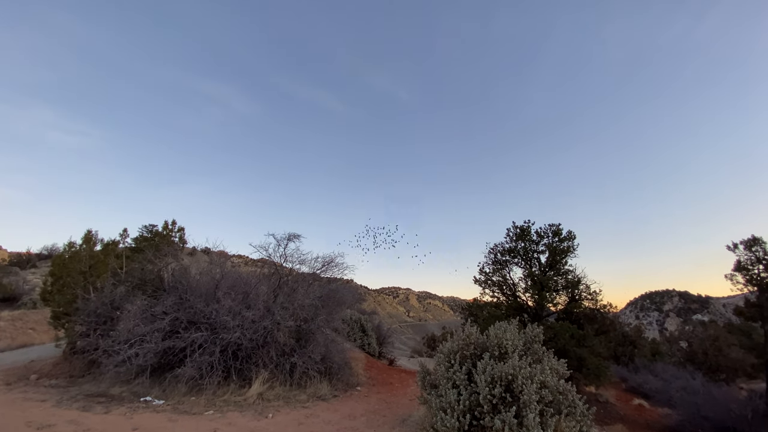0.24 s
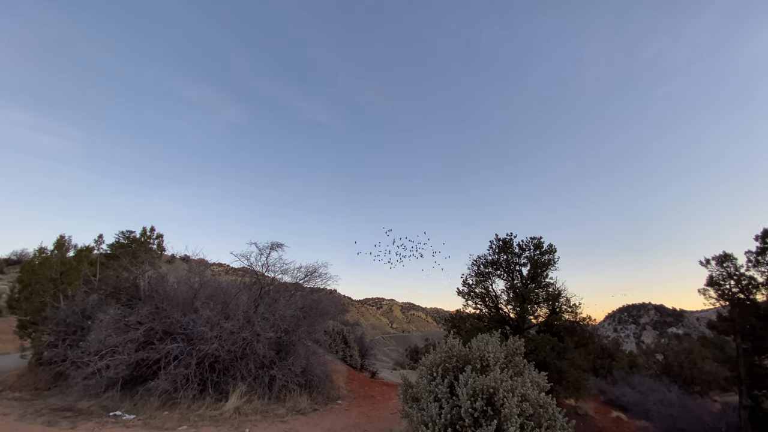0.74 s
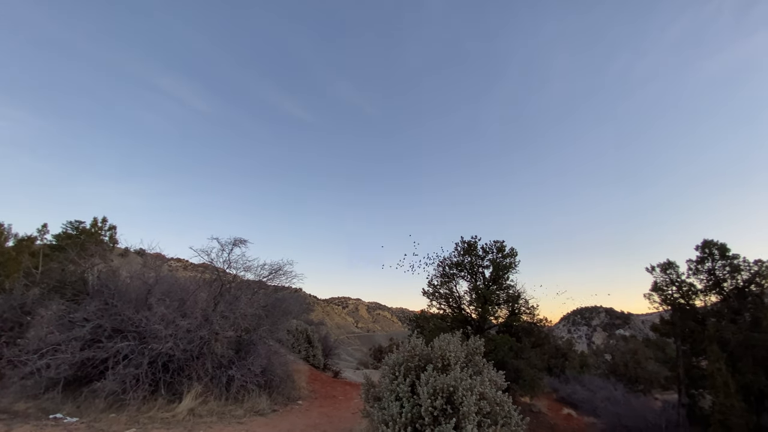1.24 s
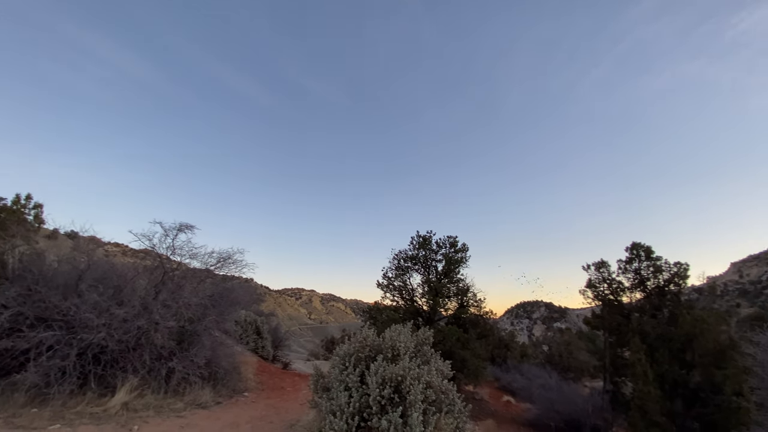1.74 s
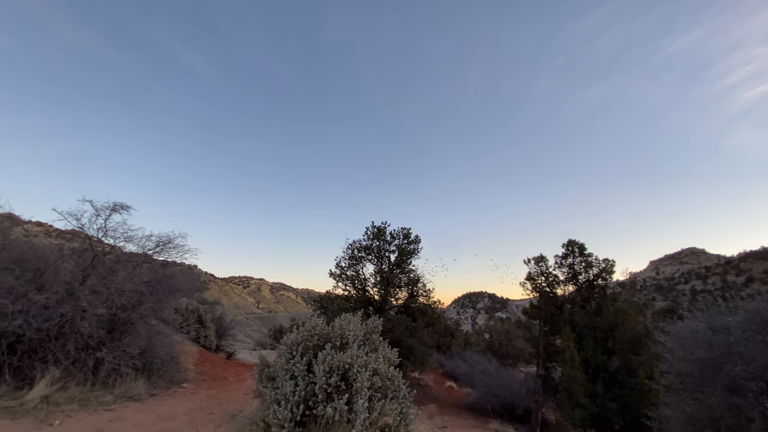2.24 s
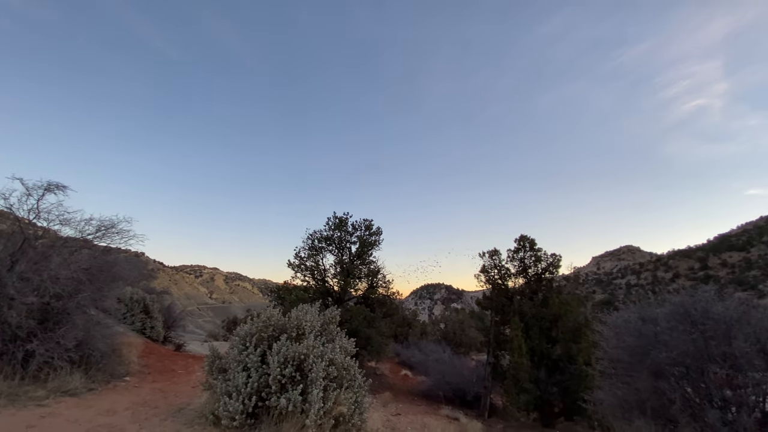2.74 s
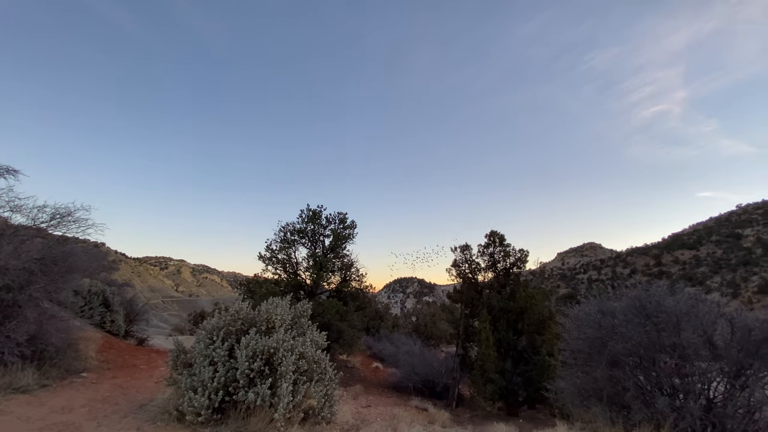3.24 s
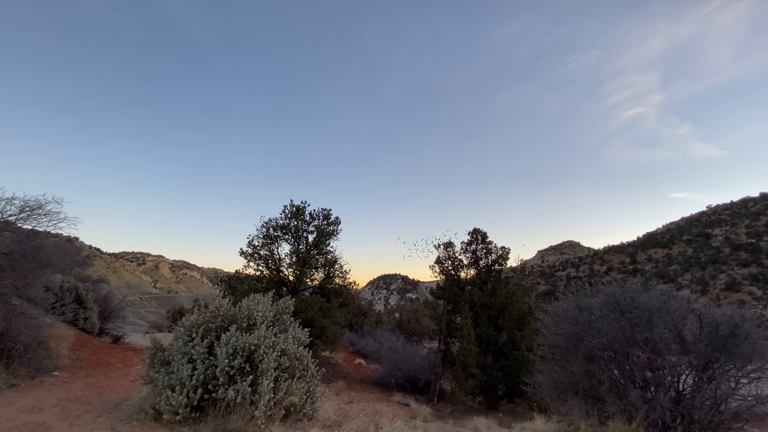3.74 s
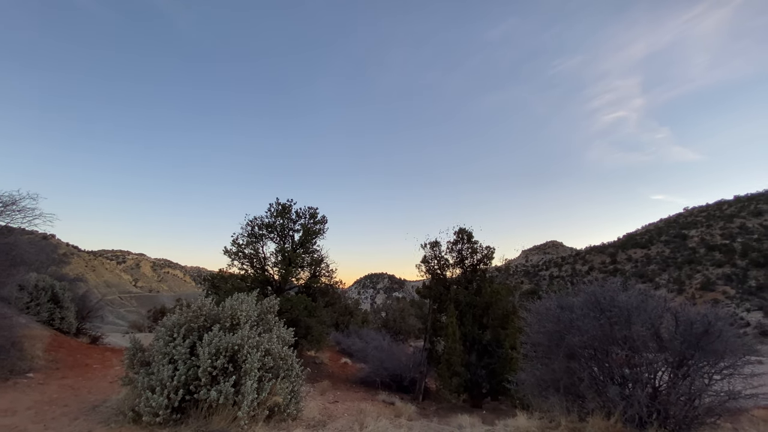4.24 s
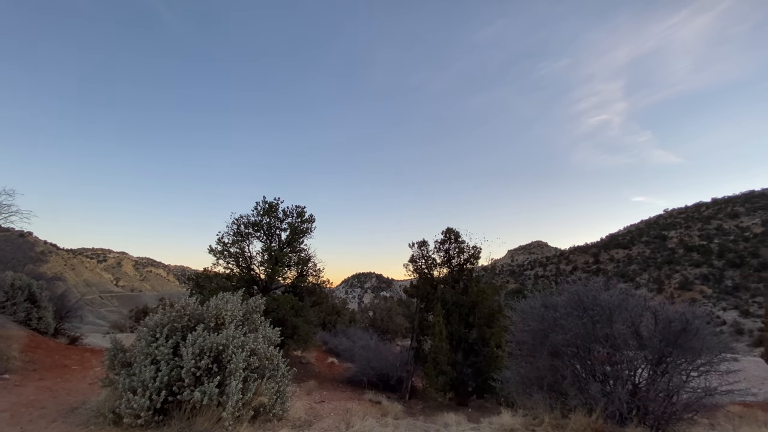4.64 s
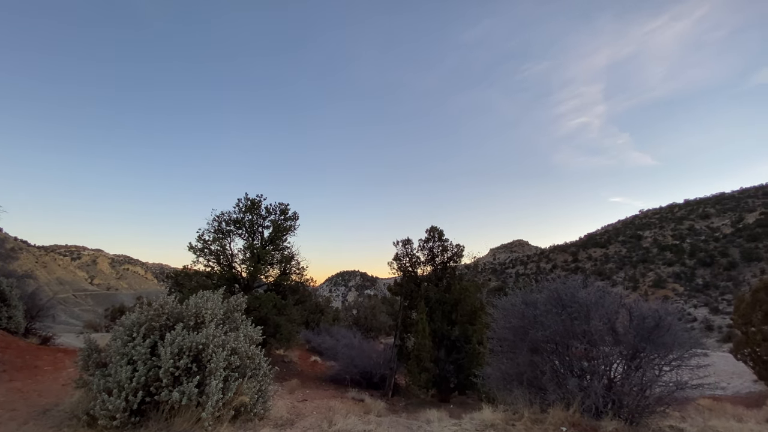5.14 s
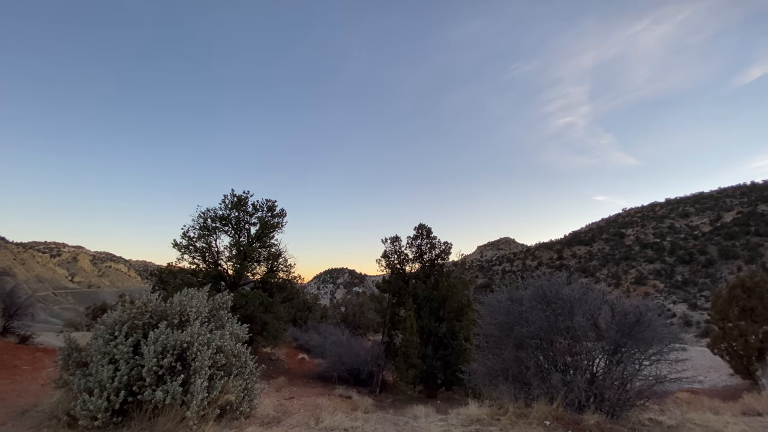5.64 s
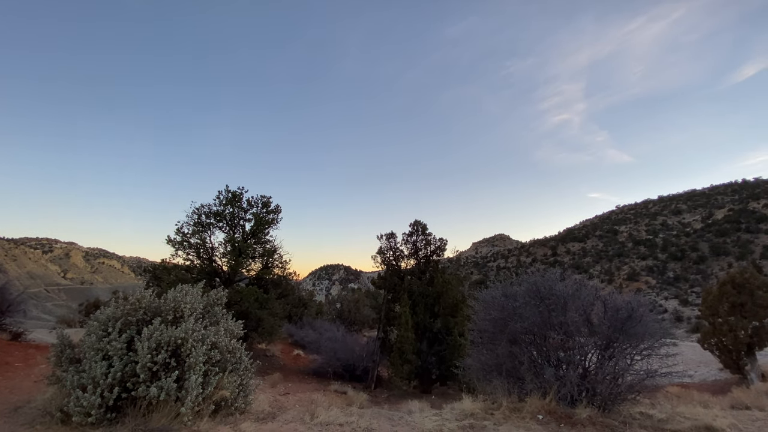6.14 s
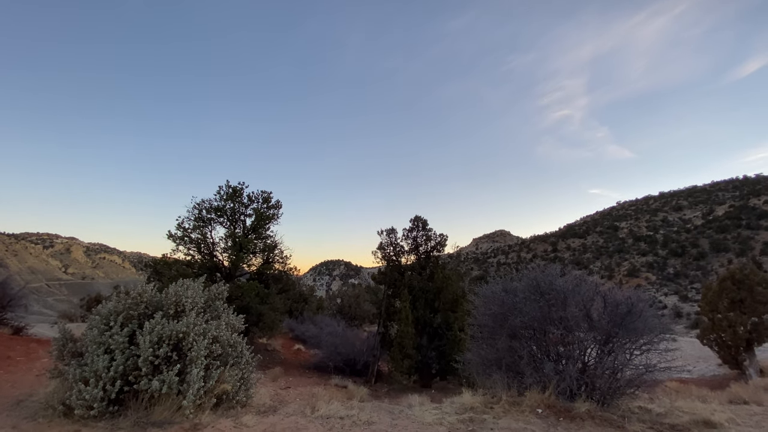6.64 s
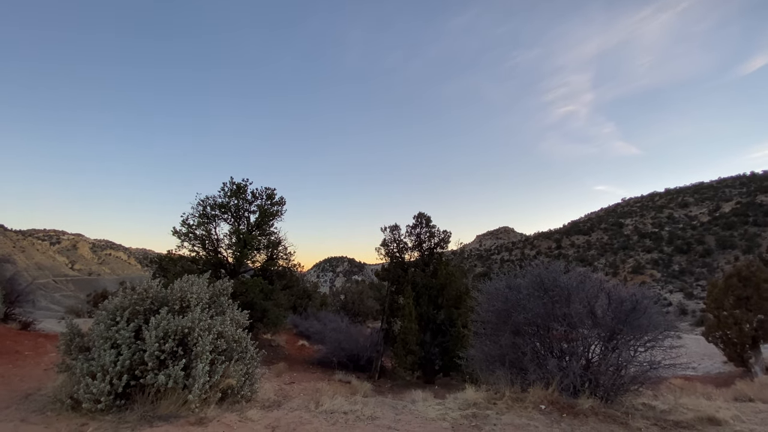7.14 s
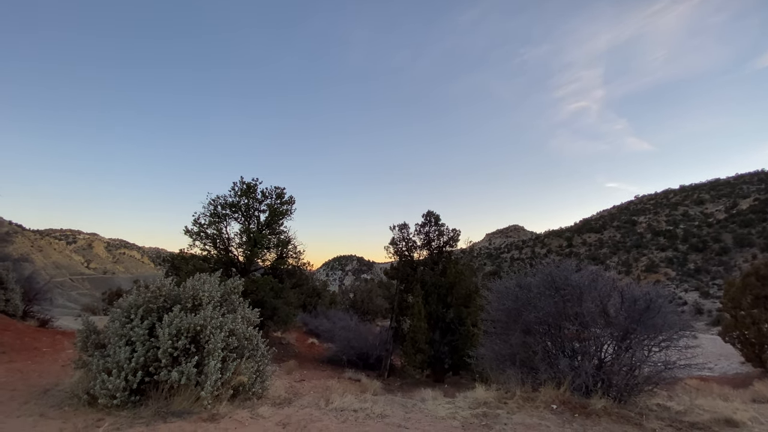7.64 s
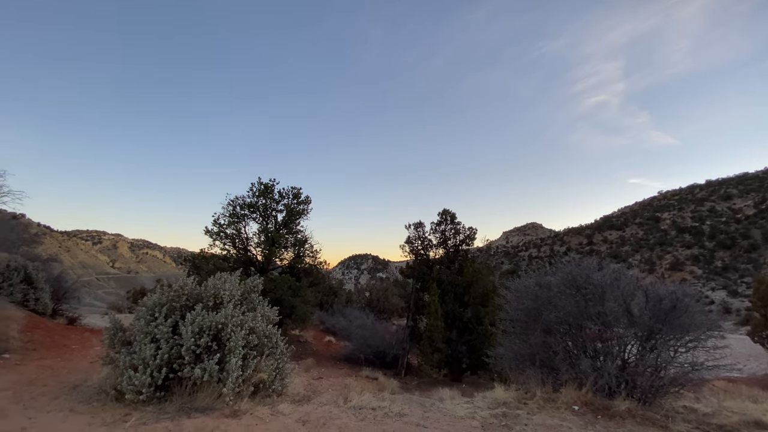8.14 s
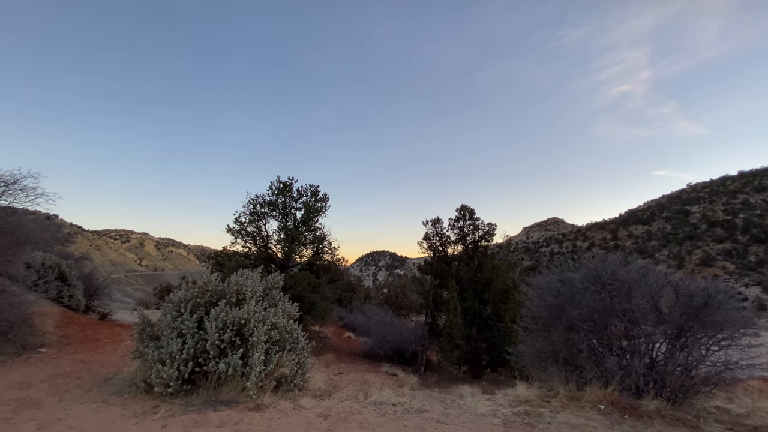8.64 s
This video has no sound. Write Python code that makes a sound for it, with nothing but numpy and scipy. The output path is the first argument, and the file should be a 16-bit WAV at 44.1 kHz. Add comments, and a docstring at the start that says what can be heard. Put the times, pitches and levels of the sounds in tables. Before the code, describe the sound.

Faint wind rocks the microphone in a quiet, open desert while many jays call in flight. Each nasal cry rises, then falls with a quaver. The cries start scattered and grow into a dense chatter, then briefly ease, leaving soft puffs of wingbeats, before building again twice. A few small dry clicks and a light hiss lie underneath.

```python
"""A flock of jays crosses open desert at dusk. From the start, slow wind rocks the microphone over a
soft hiss, wingbeats push out low puffs of air, and nasal cries overlap. Each cry is a stack of
harmonics (whole multiples of one pitch) that rises, then steps down with a quaver. From 1 s on, a
few small ticks sound nearby. The cries crowd together at 2-4 s, thin out near 5 s as the wings are
at their loudest, then come back in two waves, around 6 s and from 7 s to the end."""
import sys
import numpy as np
from scipy import signal
from scipy.fft import rfft, irfft
from scipy.io import wavfile
from scipy.ndimage import uniform_filter1d

SR = 44100
rng = np.random.default_rng(int(sys.argv[2]) if len(sys.argv) > 2 else 0)


def wrap_up_sound(samples):
    """Save the sound to the file named by the first command line argument, as 16-bit audio."""
    columns = np.atleast_2d(samples).T
    # keep every value between -1 and 1, then stretch to whole-number steps
    tamed = np.clip(columns, -1, 1)
    steps = np.round(tamed * 32767).astype(np.int16)
    wavfile.write(sys.argv[1], SR, steps)


N = 391608
TOP_HZ = 15720  # upper limit of the treble


def amp(db):
    """Turns decibels into a number to multiply by."""
    return 10 ** (np.asarray(db) / 20)


def unit_rms(x):
    """Scales a signal so its average strength (rms) is 1."""
    return x / np.sqrt(np.mean(x ** 2) + 1e-20)


def level_at(spectrum, hz):
    """Looks up a spectrum's level at hz, joining its points on a log frequency axis."""
    f, db = np.transpose(spectrum)
    return np.interp(np.log(hz + 1), np.log(f + 1), db)


def over_time(rows, column=1):
    """Gives one column of a time table at every sample."""
    rows = np.array(rows)
    return np.interp(np.arange(N) / SR, rows[:, 0], rows[:, column])


def add(mix, start_s, sound):
    """Mixes a sound in at its start time."""
    part = mix[round(start_s * SR):][:len(sound)]
    part += sound[:len(part)]


def shaped_noise(spectrum):
    """Steady noise with the given spectrum, at rms 1."""
    gain = amp(level_at(spectrum, np.fft.rfftfreq(N, 1 / SR)))
    return unit_rms(irfft(rfft(rng.standard_normal(N)) * gain, N))


def wind(level_db=-42.5, swell_db=1.6):
    """Slow swings of air pressure push on the microphone, swelling and easing by chance."""
    # spectrum of the rumble: f/Hz, relative level/dB
    rumble = [(1, -42), (3, 3.5), (8, 4), (14, -5.5), (22, -12), (32, -18), (45, -23.5), (65, -33.5),
              (120, -44.5), (200, -71)]
    t = np.arange(N) / SR
    swell = sum(np.sin(2 * np.pi * (hz * t + rng.random())) / np.sqrt(hz)
                for hz in np.geomspace(.4, 3.5, num=16))
    return amp(level_db) * unit_rms(shaped_noise(rumble) * amp(swell_db * unit_rms(swell)))


def air_and_hiss(level_db=-67.5):
    """Distant air and microphone hiss; the low part follows the gusts most."""
    # spectrum of the background: f/Hz, relative level/dB
    background = [(35, -33), (60, 0), (81, -5), (167, -11), (201, -12.5), (278, -14), (313, -14),
                  (498, -18), (774, -20.5), (1120, -22), (2010, -28), (3590, -31.5), (15600, -36)]
    # gusts (only the swing around each average counts): t/s, low air level/dB, hiss level/dB
    gusts = [(0, -70.5, -76.5), (1.1, -70, -76), (1.9, -74.5, -78.5), (3, -73, -79), (4.3, -74.5, -78.5),
             (4.6, -71.5, -77), (5.5, -72, -78.5), (6.5, -72.5, -78), (8, -74, -78.5)]
    noise = amp(level_db) * shaped_noise(background)
    low = signal.sosfilt(signal.butter(2, 900, fs=SR, output="sos"), noise)
    hiss = noise - low
    low_db, hiss_db = over_time(gusts), over_time(gusts, column=2)
    return low * amp(low_db - low_db.mean()) + hiss * amp(hiss_db - hiss_db.mean())


def wing_puff(hz, width_cycles=2):
    """One downstroke: a few soft cycles of pushed air."""
    cycles = np.arange(1500) / SR * hz
    return np.exp(-2 * (cycles / width_cycles - 1.3) ** 2) * np.sin(2 * np.pi * cycles)


def wings(puff_hz=479.6, beats_per_s=130):
    """Many birds beat their wings out of step; a few strokes stand out alone."""
    # loudness of all the wings together: t/s, level/dB
    wing_levels = [(0, -72.5), (.5, -69.5), (1.4, -69.5), (2.2, -81.5), (4.2, -87), (4.5, -62.5),
                   (4.8, -64.5), (5.2, -70.5), (5.9, -81), (6.1, -70), (7.1, -71), (7.5, -78), (7.9, -72),
                   (8.88, -77.5)]
    # single strokes: t/s, peak level/dB
    flaps = [(0.034, -54), (0.138, -58), (0.279, -54.5), (1.325, -52), (4.29, -57), (4.436, -55),
             (4.567, -51), (4.787, -53), (5.112, -55), (5.28, -76), (5.534, -56), (6.027, -57),
             (6.111, -59), (6.963, -55)]
    strength = amp(0.63 * np.minimum(rng.exponential(1, N), 3))
    beats = strength * (rng.random(N) < beats_per_s / SR)
    pitch_choice, out = rng.integers(0, 12, N), np.zeros(N)
    for k, hz in enumerate(puff_hz * np.geomspace(.9, 1.12, num=12)):
        out += signal.oaconvolve(beats * (pitch_choice == k), wing_puff(hz))[:N]
    out = unit_rms(out) * amp(over_time(wing_levels))
    for s, db in flaps:
        add(out, max(s - .003, 0), amp(db) * wing_puff(puff_hz * 1.01))
    return out


def cry(start, top, end, top_hz, climb, bend, sag_s, quaver_s, quaver_depth,
        db, fade_db_per_s, third_db, fourth_db, loss_db_per_khz, beak_db, harmonics=16):
    """A bird's voice box makes harmonics; throat and beak shape them, and moving air makes them waver."""
    # how throat and beak colour the voice: f/Hz, relative level/dB
    throat = [(600, -14), (1000, -9.5), (1300, 2.5), (1800, 10), (2300, -0.5), (2850, -2.5), (3300, -12),
              (4000, -24), (4600, -15.5), (5400, -12), (6100, -18), (7200, -18), (8800, -37), (11500, -17),
              (14000, -38)]
    scoop, scoop_s = .22, .018  # the pitch starts this share lower and quickly catches up
    sag_to = .65  # then sinks toward this share of its top
    drop_s, drop_per_s = .025, 7.  # and falls away at the end
    attack_s, release_s = 0.011, 0.019
    beak_hz, beak_width_hz = 2920, 300
    rise_s, fall_s = top - start, end - top
    t = np.arange(0, rise_s + fall_s + drop_s, 1 / SR)
    since_top = np.maximum(t - rise_s, 0)

    rise = (1 - climb * np.maximum(1 - t / rise_s, 0) ** bend) * (1 - scoop * np.exp(-t / scoop_s))
    sag = sag_to + (1 - sag_to) * np.exp(-since_top / sag_s)
    quaver = 1 - quaver_depth * np.sin(np.pi * since_top / quaver_s) ** 2
    drop = 1 - drop_per_s * np.maximum(since_top - fall_s, 0)
    hz = uniform_filter1d(top_hz * rise * sag * quaver * drop, size=400)
    jitter = unit_rms(uniform_filter1d(rng.standard_normal(len(t)), size=500))
    hz *= 1 + 0.0038 * jitter

    k, step = np.arange(1, harmonics + 1)[:, None], 64  # harmonic numbers; samples per level update
    harmonic_hz = k * hz[::step]
    waver = unit_rms(uniform_filter1d(rng.standard_normal(harmonic_hz.shape), size=22, axis=1))
    waver_db = (1.9 + 2.0 * (k > 2)) * waver  # upper harmonics waver most
    voice_db = level_at(throat, harmonic_hz) - max(level for _, level in throat)
    voice_db += third_db * (k == 3) + fourth_db * (k == 4)
    voice_db += beak_db * np.exp(-((harmonic_hz - beak_hz) / beak_width_hz) ** 2)
    air_loss_db = max(loss_db_per_khz, 0) * np.maximum(harmonic_hz - 2 * top_hz, 0) / 1000
    gain = amp(voice_db - air_loss_db + waver_db) * (harmonic_hz < TOP_HZ)
    gain = np.repeat(gain, step, axis=1)[:, :len(t)]

    cycles = np.cumsum(hz) / SR
    voice = np.sum(gain * np.sin(2 * np.pi * k * cycles), axis=0)
    soft_ends = np.clip(np.minimum(t / attack_s, (t[-1] - t) / release_s), 0, 1)
    return np.sqrt(2) * amp(db - fade_db_per_s * since_top) * soft_ends * voice


def near_birds():
    """Jays close enough for each cry to stand out."""
    # one cry a row: start/s, top/s, end/s, top pitch/Hz, climb/share of top pitch, bend of the rise/power,
    # sag time/s, quaver period/s, quaver depth/share, level/dB, fade after the top/(dB per s),
    # third harmonic/dB, fourth harmonic/dB, treble lost to the air/(dB per kHz), beak ring/dB
    cries = [(0.0, 0.099, 0.14, 990.0, 0.08, 0.88, 0.5, 0.065, 0.0, -72, 1.0, -6, -5, 4, 1.0),
             (0.095, 0.193, 0.413, 1071, 0.2, 0.75, 0.096, 0.098, 0.088, -59.5, 21, 0.5, 0.0, 0.3, 9.5),
             (0.606, 0.728, 0.862, 1014, 0.21, 1, 0.14, 0.11, 0.1, -55.5, 29, -7.5, 4.0, 0.8, -2),
             (0.845, 0.88, 1.015, 916, 0.0, 0.8, 0.16, 0.079, 0.0, -73, 5, -1, 2, -1, 3),
             (1.258, 1.322, 1.482, 1082, 0.21, 0.95, 0.059, 0.058, 0.058, -66, -1, -2, -3, 0, -3),
             (1.401, 1.501, 1.6, 963, 0.054, 0.76, 0.13, 0.1, 0.1, -59, 35.0, -6, -13, 2.1, 3),
             (1.615, 1.662, 1.68, 665, 0.11, 0.94, 0.18, 0.1, 0.0, -66.5, -1.0, -2.5, -3, 2, -1),
             (1.831, 1.92, 2.027, 1023, 0.16, 0.97, 0.27, 0.064, 0.13, -70.5, -8, 0, -4.0, 0, 2),
             (1.878, 1.979, 2.105, 956, 0.15, 0.9, 0.16, 0.11, 0.13, -57.0, 30.0, -3.5, -13, 1, 4),
             (2.116, 2.202, 2.235, 670, 0.043, 1.04, 0.18, 0.1, 0.014, -66.0, 5.0, -2, 1, 0, -4),
             (2.166, 2.328, 2.575, 948.0, 0.36, 1.2, 0.13, 0.109, 0.12, -63.5, 1, -7.5, 0, 4.5, 1.0),
             (2.202, 2.33, 2.473, 980, 0.17, 1.03, 0.075, 0.12, 0.018, -61.5, 16, -1.5, -13, 0.9, 0),
             (2.236, 2.317, 2.384, 1037, 0.08, 1.5, 0.15, 0.123, 0.081, -66, -10.0, 1, -4, -3, 1.0),
             (2.31, 2.441, 2.544, 1045.0, 0.14, 1.7, 0.067, 0.14, 0.06, -64.5, 15, 2, -2, 3, -4),
             (2.324, 2.429, 2.566, 826.0, 0.041, 2.2, 0.219, 0.095, 0.093, -67.5, -8.0, -7, -2, 1.8, -1),
             (2.397, 2.451, 2.503, 661, 0, 1.5, 0.42, 0.067, 0.058, -70.0, 0.0, 6, -3, 3, 1.0),
             (2.596, 2.673, 2.69, 998, 0.04, 1.0, 0.22, 0.1, 0.015, -72.5, -3.0, -8, -2.0, -3, 0.0),
             (2.691, 2.764, 3.005, 1065.0, 0.17, 0.8, 0.2, 0.064, 0.057, -62.5, 18, -13, -1.0, 2, 1.0),
             (2.694, 2.742, 2.81, 905.0, 0.18, 1.7, 0.061, 0.072, 0.08, -73, 35.0, -5, 0, 5, 1.0),
             (2.702, 2.781, 2.954, 1018, 0.13, 0.9, 0.117, 0.067, 0.039, -65.5, 20, -5, -2, 0.5, 1.0),
             (2.929, 3.016, 3.036, 799.0, 0.16, 1.4, 0.14, 0.15, 0.01, -65, 18.0, -13, -1, 1.2, 1.0),
             (2.957, 3.054, 3.249, 922, 0.22, 1.03, 0.26, 0.077, 0.078, -61, 13.0, -9.0, -1.0, 1.5, 0),
             (3.062, 3.148, 3.365, 1086, 0.2, 1.24, 0.097, 0.08, 0.0054, -64, -16, -2.5, -3.0, 1.3, -1),
             (3.079, 3.171, 3.45, 989, 0.19, 0.82, 0.11, 0.07, 0.089, -63.5, 5, -5, -7, 4, 0),
             (3.118, 3.146, 3.327, 773, 0.0, 1.2, 0.53, 0.092, 0.11, -66.5, -8, 0.5, -7.0, 1.2, 1.0),
             (3.2, 3.339, 3.489, 948, 0.33, 0.92, 0.048, 0.082, 0.067, -70.5, -6, 3, -1, 2, 1.0),
             (3.265, 3.401, 3.539, 859, 0.31, 1.05, 0.29, 0.082, 0.11, -74, -8.0, -1.0, -10, -0.5, 3),
             (3.31, 3.467, 3.549, 918, 0.27, 0.82, 0.49, 0.079, 0.14, -67, -8, -7, -3, 3, 3),
             (3.442, 3.557, 3.715, 971, 0.11, 2.55, 0.093, 0.12, 0.0076, -57.5, 53.0, -5, -14, 1, -5),
             (3.448, 3.558, 3.615, 1008, 0.27, 1.8, 0.216, 0.13, 0.098, -57.5, -14, -9, -11, 5, -1),
             (3.458, 3.53, 3.642, 769, 0.35, 1.4, 0.278, 0.099, 0.15, -70, 2.0, 3, -2, 5, -1),
             (3.491, 3.566, 3.772, 913, 0.12, 1.5, 0.091, 0.14, 0.0052, -60.5, 17, -0.5, -15, 1.5, -13),
             (3.548, 3.653, 3.771, 739, 0.22, 1.37, 0.17, 0.12, 0.12, -71.0, -10.0, 9, -6.0, 7, -4),
             (3.637, 3.778, 3.831, 851, 0.08, 0.9, 0.062, 0.083, 0.02, -66, -7.0, -4, -8.0, 0.5, -1),
             (3.86, 3.92, 4.03, 735.0, 0.15, 1.0, 0.46, 0.11, 0.14, -82.5, 13.0, 8.5, -2, 0, 1.0),
             (4.094, 4.187, 4.334, 1140, 0.17, 0.8, 0.125, 0.096, 0.1, -62.5, 21, -3, -6.0, 0.5, 3),
             (4.155, 4.253, 4.355, 1033, 0.23, 1.0, 0.16, 0.14, 0.005, -63, 29.0, -7, -2, 0.5, 0),
             (4.211, 4.272, 4.427, 1033, 0.15, 1.1, 0.14, 0.12, 0.1, -61, 6.0, -5.5, -7.0, 1.0, -2),
             (4.213, 4.255, 4.397, 979, 0.084, 0.91, 0.15, 0.124, 0.13, -65, 36, -6, -7, 2, -1),
             (4.619, 4.741, 4.915, 904, 0.18, 0.82, 0.11, 0.071, 0.086, -63.5, 20, -1, -4.0, 3, -4),
             (5.332, 5.441, 5.627, 992, 0.1, 0.9, 0.22, 0.1, 0.075, -69.5, 20, -1.5, -3, 4, 9),
             (5.416, 5.509, 5.649, 1036.0, 0.16, 0.87, 0.096, 0.127, 0.0059, -70, -4, -2, 0, 0, 0),
             (5.502, 5.591, 5.681, 982, 0.19, 1.25, 0.15, 0.098, 0.15, -63.5, -12, -20, -15, 1, 1.0),
             (5.586, 5.667, 5.882, 1080, 0.11, 0.9, 0.091, 0.097, 0.05, -68.5, 36, 5, 6, 5, -4),
             (5.619, 5.758, 5.995, 948, 0.23, 0.77, 0.22, 0.14, 0.027, -66, 13, 3, 4, 3, -6),
             (5.673, 5.803, 5.923, 873, 0.059, 1.8, 0.19, 0.09, 0.037, -71.5, -10.0, 1.5, 6, 0.5, 1.0),
             (5.772, 5.855, 5.965, 1027, 0.1, 0.8, 0.47, 0.115, 0.057, -66.5, 35, -7.0, 1.0, 2.7, 1.0),
             (5.894, 6.003, 6.07, 1100, 0.15, 1.3, 0.16, 0.071, 0.037, -65, 9.0, 0, -2.0, 2.9, -1),
             (5.907, 5.976, 6.226, 1113, 0.14, 1.5, 0.14, 0.094, 0.034, -59.5, 55.0, -2.5, 0, 1.5, 1.0),
             (5.914, 5.983, 6.187, 1053, 0.14, 1.95, 0.11, 0.066, 0.0, -68.0, 15.0, -9, 0.0, 4, 4),
             (5.915, 5.977, 6.223, 768, 0.041, 1.45, 0.25, 0.092, 0.047, -74.5, -13, 1, -1.0, 3, 1.0),
             (5.932, 6.028, 6.118, 1092, 0.23, 2.4, 0.057, 0.1, 0.06, -67, 14.0, 1, -2, 1.7, 2),
             (6.111, 6.216, 6.36, 916.0, 0.22, 0.92, 0.096, 0.09, 0.052, -67, 1, -3, -5, 1.9, 3),
             (6.408, 6.522, 6.792, 1021, 0.19, 0.77, 0.18, 0.099, 0.065, -62, 10, -11, -1, 3, -5),
             (6.507, 6.652, 6.782, 957, 0.016, 1.43, 0.17, 0.093, 0.075, -70.5, 4, -3, -6, 5, 10),
             (6.532, 6.61, 6.784, 987, 0.15, 1.47, 0.074, 0.093, 0.097, -68.5, -5, -5.0, -6.0, 2.4, 1.0),
             (6.537, 6.601, 6.698, 929, 0.07, 1.75, 0.095, 0.09, 0.11, -66, -4.0, -5, -6, 4, 3),
             (6.816, 6.878, 7.019, 864, 0.092, 0.77, 0.17, 0.12, 0.088, -67.5, 2.0, -9, -5, 4, 4),
             (7.178, 7.306, 7.469, 1041, 0.26, 1.08, 0.15, 0.056, 0.11, -63.5, -3, -8.5, -11, 4, 2),
             (7.235, 7.353, 7.531, 1055, 0.2, 1.0, 0.051, 0.071, 0.13, -67.5, -13, -8, -7, 3, 1.0),
             (7.271, 7.35, 7.471, 926, 0.19, 1.09, 0.17, 0.11, 0.14, -64.5, -10.0, -11, -8, 3.3, 3),
             (7.424, 7.577, 7.811, 1107, 0.09, 1.2, 0.078, 0.11, 0.014, -65, 11, -6.0, -3, 5, 1.0),
             (7.446, 7.568, 7.696, 1068, 0.16, 2.4, 0.27, 0.11, 0.01, -65.5, 43, 3, 1, 4, 1.0),
             (7.492, 7.589, 7.792, 1041, 0.3, 1.0, 0.18, 0.083, 0.04, -68.5, 2, 0.5, 1, 0, 6),
             (7.495, 7.578, 7.684, 976, 0.25, 1.3, 0.27, 0.072, 0.14, -72, -10.0, 3, 7, 0, 1.0),
             (7.575, 7.648, 8.007, 920, 0.22, 1.35, 0.205, 0.082, 0.0042, -65.5, -1, -1.5, 3.5, 2.5, 4),
             (7.713, 7.816, 7.909, 989.0, 0.17, 1.07, 0.262, 0.07, 0.085, -63, -9, -13.0, -6.0, 3.7, 3),
             (7.742, 7.845, 8.037, 980, 0.2, 1.0, 0.17, 0.16, 0.12, -63.5, -6, -13, -10.0, 9, 9),
             (7.755, 7.807, 7.932, 898, 0.16, 1, 0.08, 0.087, 0.095, -70, -6.0, -2.0, 4, 2.6, 4),
             (7.953, 8.089, 8.201, 1024, 0.14, 1.24, 0.088, 0.121, 0.05, -64.5, -8, -9, -3.0, 6, -1),
             (7.952, 8.093, 8.265, 967, 0.14, 1.6, 0.081, 0.083, 0.019, -68.0, -6, -5, -2, 7, 5),
             (7.986, 8.115, 8.336, 1000, 0.11, 1.5, 0.22, 0.12, 0.15, -66, 8.0, -6.0, -7, 3.0, 6),
             (8.005, 8.109, 8.25, 973, 0.2, 1.13, 0.076, 0.12, 0.052, -66, -5.0, -8, -13, 3.5, 4),
             (8.087, 8.174, 8.354, 996.0, 0.16, 0.67, 0.384, 0.13, 0.074, -64.5, 30, -4, 0, 2.5, 2),
             (8.137, 8.245, 8.381, 1001, 0.13, 1.07, 0.2, 0.11, 0.085, -65.5, 24.0, -2.5, 4, 3.8, 4),
             (8.298, 8.49, 8.553, 1084, 0.26, 0.96, 0.14, 0.088, 0.11, -66.5, 3, -3.5, 4, 2.9, 1.0),
             (8.321, 8.375, 8.556, 893, 0.052, 1.18, 0.36, 0.13, 0.13, -67, -8, -9, 2, 2.2, -1),
             (8.328, 8.441, 8.624, 982.0, 0.19, 1.1, 0.095, 0.093, 0.07, -69.5, 12, 2, -1, 0.5, 5),
             (8.351, 8.455, 8.686, 941.0, 0.19, 2.0, 0.23, 0.085, 0.044, -68, -2, -6, 0.0, 3.5, -4),
             (8.579, 8.675, 8.866, 1055, 0.14, 1.0, 0.17, 0.11, 0.091, -71.5, 28.0, 0, -4, 3.4, 6),
             (8.577, 8.683, 8.778, 880, 0.14, 0.9, 0.094, 0.14, 0.03, -74, -8.0, 5, 0, 1, 1.0),
             (8.695, 8.767, 8.866, 935, 0.13, 1.3, 0.106, 0.083, 0.1, -71.0, -10.0, 1, -5.0, 2, 1.0),
             (8.788, 8.882, 9.055, 1006.0, 0.17, 0.66, 0.071, 0.135, 0.01, -66.5, 0.0, -4, 2.0, 4.4, 0)]
    out = np.zeros(N)
    for row in cries:
        add(out, row[0], cry(*row))
    return out


def far_birds(count=100):
    """Many more jays, dulled by distance, each with its own timing, pitch, quaver and loudness."""
    # loudness of the far flock: t/s, level/dB
    flock_levels = [(0, -86), (1, -78), (1.7, -80.5), (2.15, -79), (2.65, -73), (3.2, -75.5), (3.7, -68),
                    (3.95, -77), (5.1, -94), (6.1, -70.5), (6.5, -71), (7.15, -91), (7.5, -74),
                    (8.88, -72.5)]
    out = np.zeros(N)
    for n, (when, length, pitch, sag, slow, deep, quiet, bright) in enumerate(rng.random((count, 8))):
        start = (n + when) * N / SR / count
        bright_db = -3 + 8 * bright
        add(out, start, cry(
            start, top=start + .07 + .05 * length, end=start + .19 + .24 * length,
            top_hz=880 + 220 * pitch, climb=.17, bend=1.2, sag_s=.07 + .12 * sag,
            quaver_s=.075 + .045 * slow, quaver_depth=.12 * deep, db=-8 * quiet, fade_db_per_s=14,
            third_db=bright_db, fourth_db=bright_db, loss_db_per_khz=6.1, beak_db=0, harmonics=6))
    return unit_rms(out) * amp(over_time(flock_levels))


def ground_echo(sound, decay_s=0.41):
    """Earth, rocks and bushes throw back a short scatter of echoes."""
    t = np.arange(6000) / SR
    echoes = rng.choice([-1., 1.], len(t)) * (rng.random(len(t)) < .04)
    echoes *= amp(-60 * t / decay_s) * (t > .004)
    return signal.oaconvolve(sound, echoes / np.linalg.norm(echoes))[:N]


def ticks():
    """Small dry clicks, each a tone that swells and dies almost at once."""
    # clicks: t/s, peak level/dB, f/Hz, bandwidth/Hz (wider is shorter)
    clicks = [(.988, -53, 1300, 1500), (1.3035, -55, 6500, 9000), (1.3065, -53, 6000, 9000),
              (2.677, -50, 1300, 1500), (2.759, -56, 1200, 1300), (5.449, -58, 1800, 2500)]
    out, t = np.zeros(N), np.arange(400) / SR
    for s, db, hz, width_hz in clicks:
        age = np.pi * width_hz * t
        add(out, s, amp(db) * age * np.exp(1 - age) * np.sin(2 * np.pi * hz * t))
    return out


def scene():
    """Mixes the birds, their echo and the other sounds into one channel."""
    birds = near_birds() + far_birds()
    return (birds + amp(-13.5) * ground_echo(birds) + wings() + ticks() + air_and_hiss() + wind())[None]


def record(dry):
    """Cuts off the treble above TOP_HZ."""
    lowpass = signal.firwin(511, TOP_HZ, window=("kaiser", 9), fs=SR)
    return signal.oaconvolve(dry, lowpass[None], "same")


dry = scene()
out = record(dry)
wrap_up_sound(out)
```